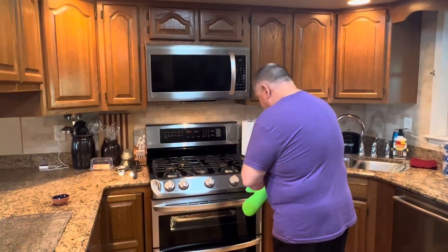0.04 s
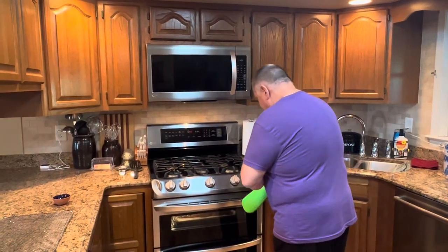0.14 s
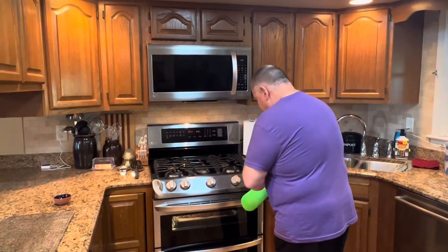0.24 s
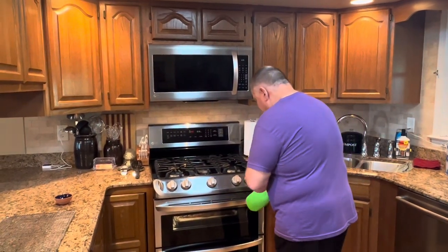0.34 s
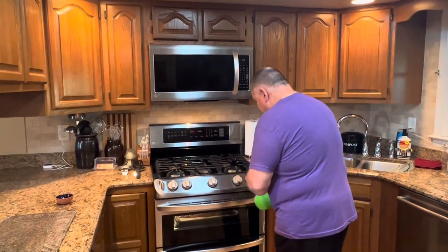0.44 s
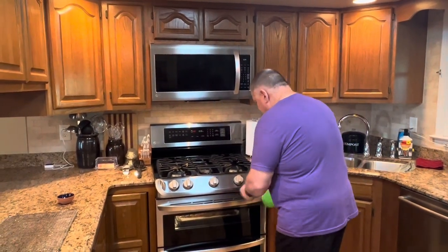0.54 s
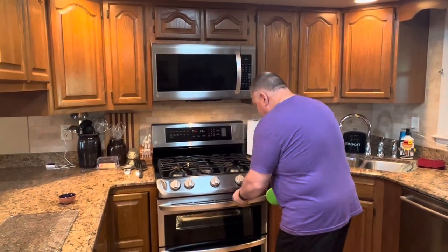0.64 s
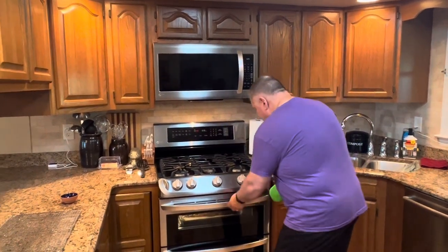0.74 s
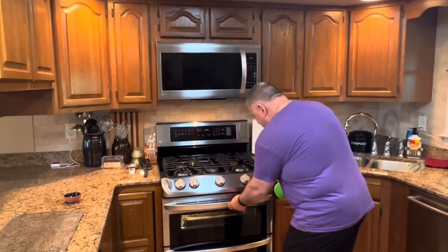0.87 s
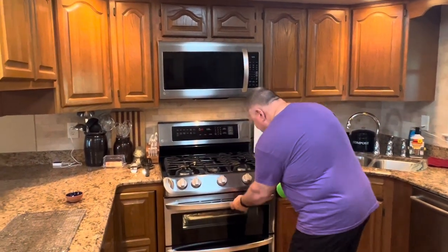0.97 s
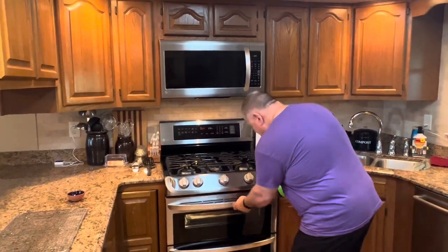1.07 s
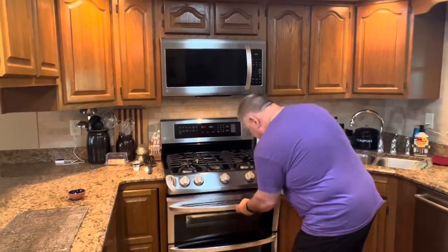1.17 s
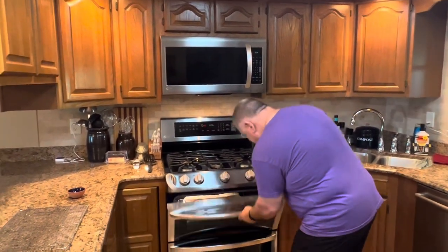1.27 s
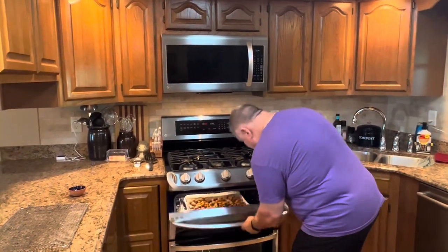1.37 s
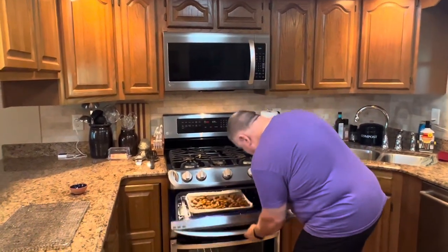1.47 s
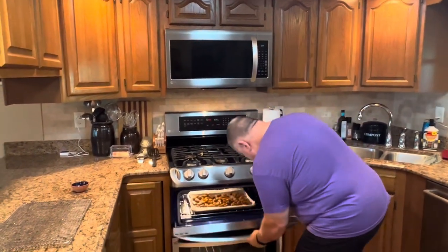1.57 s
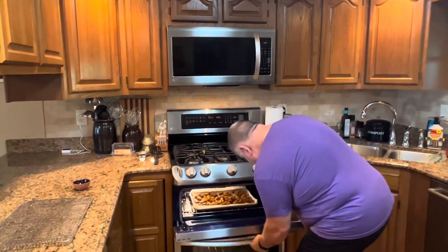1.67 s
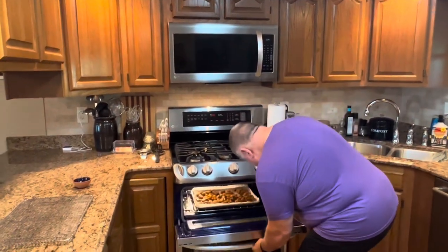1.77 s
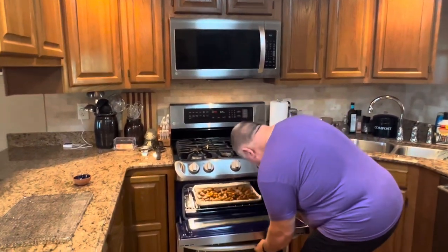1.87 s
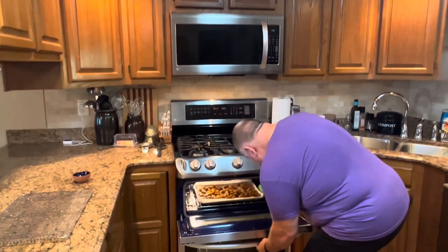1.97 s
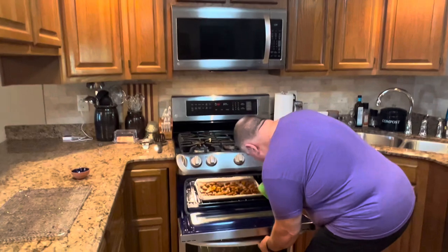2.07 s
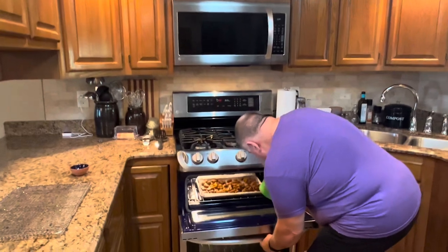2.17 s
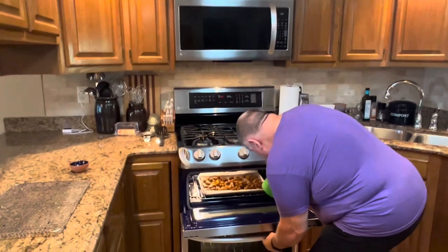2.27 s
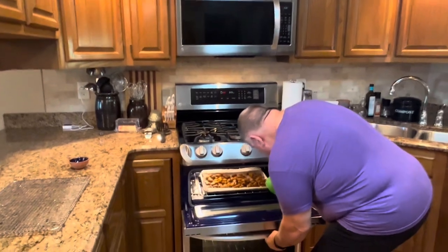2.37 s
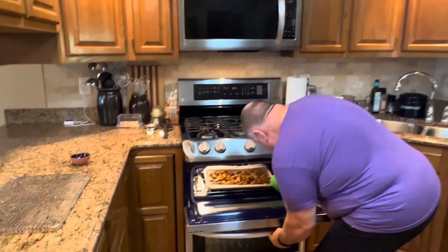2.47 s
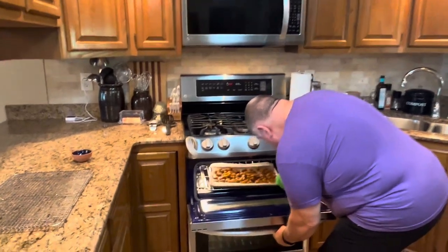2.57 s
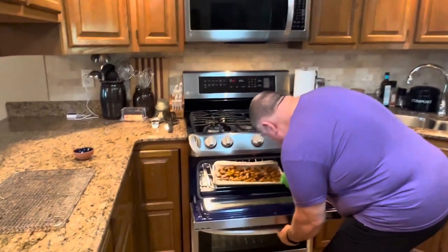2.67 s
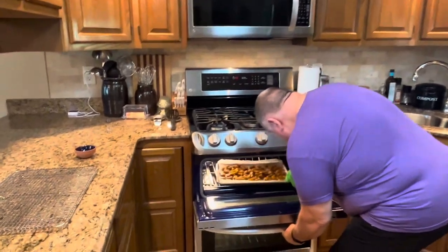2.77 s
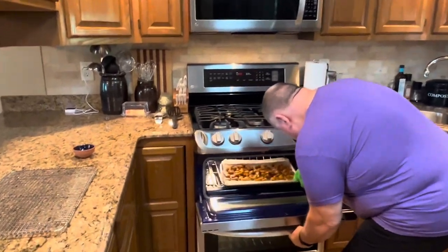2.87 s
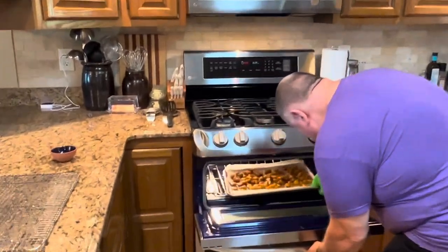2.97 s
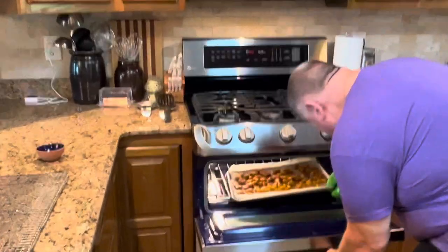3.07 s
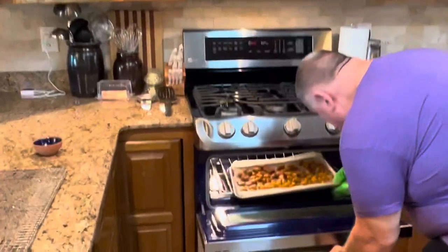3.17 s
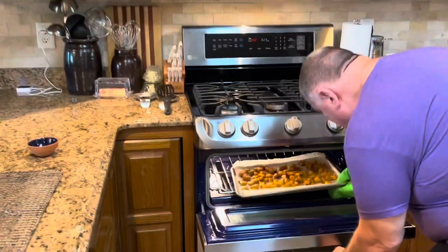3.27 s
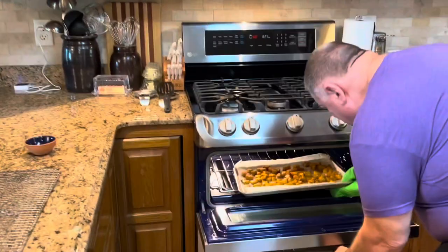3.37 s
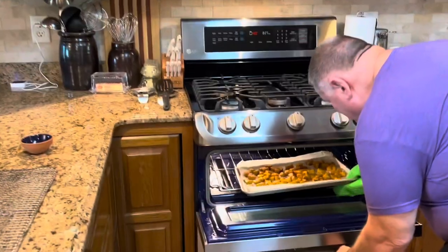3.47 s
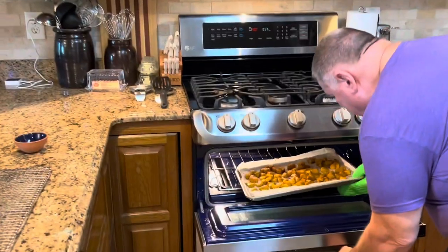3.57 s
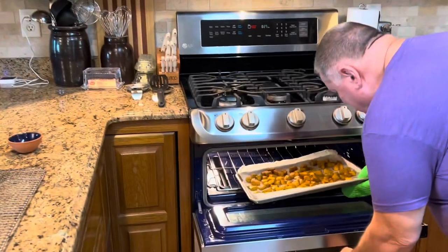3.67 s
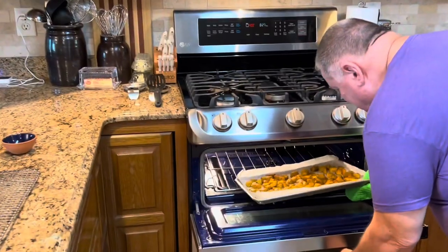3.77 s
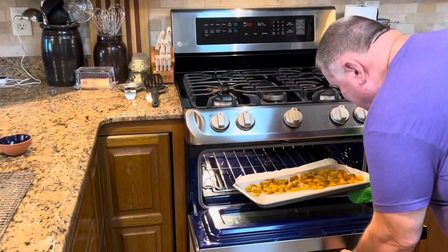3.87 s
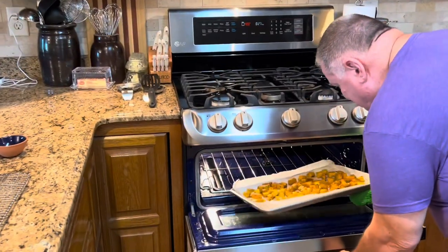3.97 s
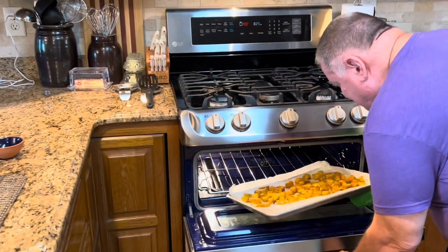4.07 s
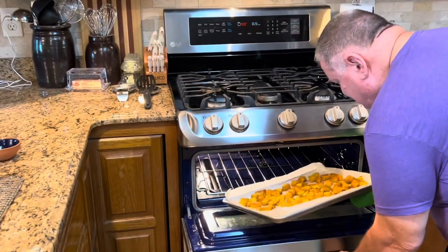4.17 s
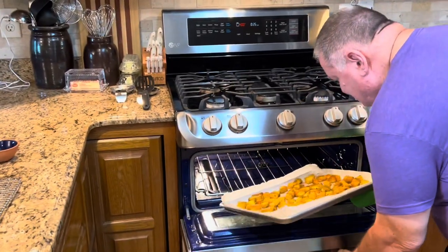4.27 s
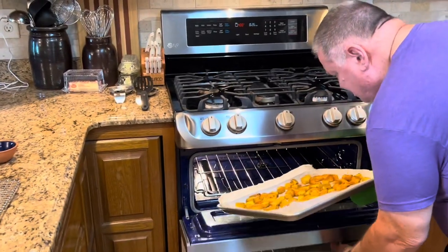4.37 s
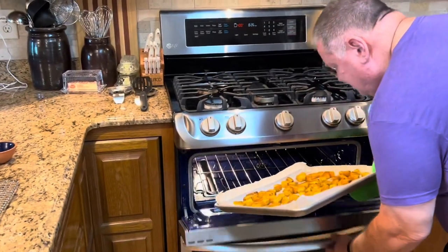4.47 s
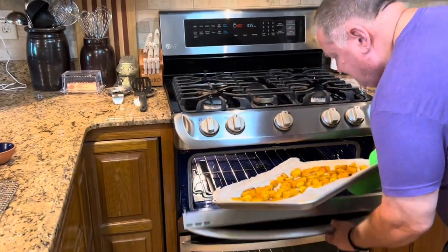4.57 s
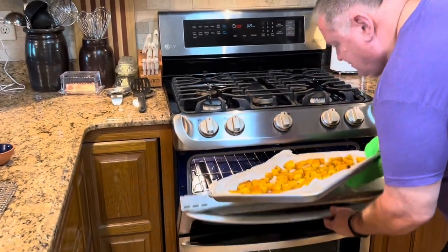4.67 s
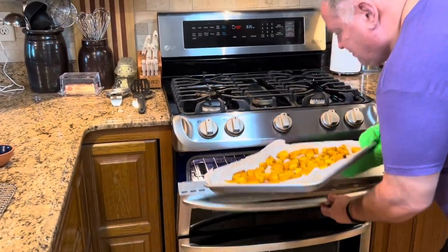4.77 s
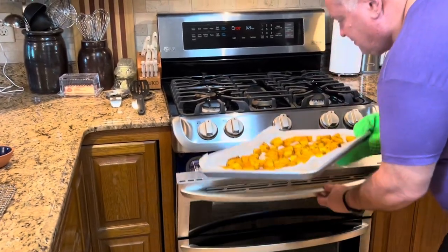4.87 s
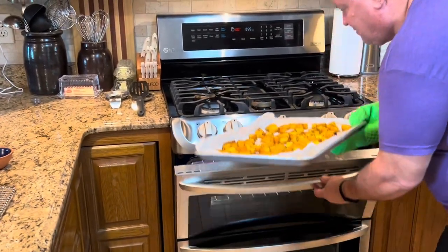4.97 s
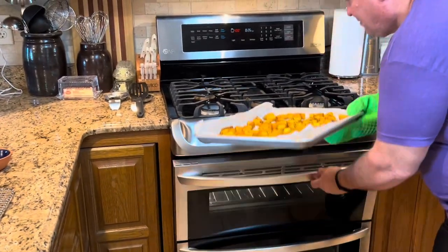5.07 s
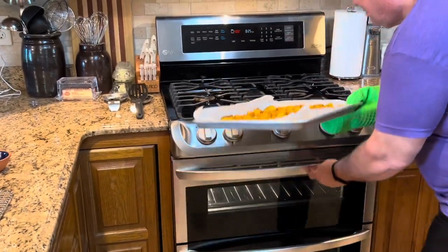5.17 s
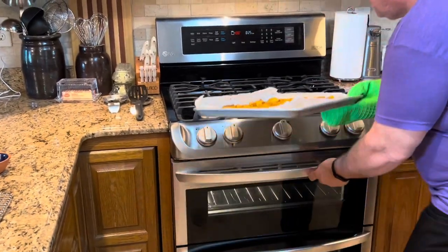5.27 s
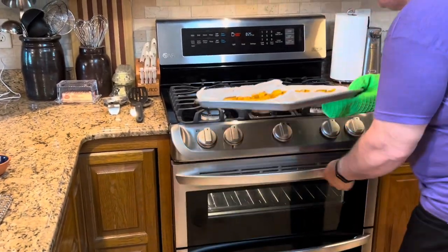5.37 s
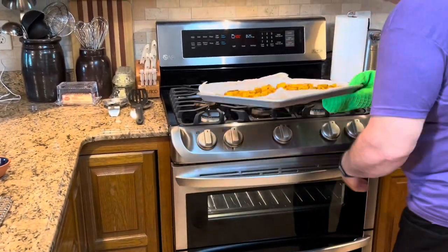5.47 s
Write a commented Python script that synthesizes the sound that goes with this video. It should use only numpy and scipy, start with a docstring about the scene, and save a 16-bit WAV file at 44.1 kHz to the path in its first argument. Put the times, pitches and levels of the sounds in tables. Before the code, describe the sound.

In a home kitchen with a faint low hum, an oven door is pulled open with rubbing hinges, dull rumble and scattered knocks. A baking sheet is dragged over the wire rack, grating and clinking while parchment rustles and snaps. After a quiet gap the door is lifted and slams loudly, with a short echo. Stereo microphone a few steps away.

```python
"""A low room hum and rubbing hinges come first, with knocks, as an oven door is pulled open in a kitchen.
Then a baking sheet lined with parchment is dragged out over the rack: wires grate and drone, paper rustles
and snaps, the sheet clinks and rings faintly. Last, the door is lifted and slammed. Shaped noise makes the
rubbing and the hum, bursts of tiny impacts the contacts, decaying sines the ringing metal.
Two microphone ports, close together, hear it from a few steps away, with the echoes of the kitchen."""
import sys
import numpy as np
from scipy import signal
from scipy.fft import rfft, irfft, next_fast_len
from scipy.io import wavfile
from scipy.ndimage import uniform_filter1d

SR = 44100
rng = np.random.default_rng(int(sys.argv[2]) if len(sys.argv) > 2 else 0)


def output_pcm(signal):
    """Save a mono or channel-first signal as 16-bit PCM at the path in sys.argv[1].

    Samples are clipped to [-1, 1] before scaling.
    """
    pcm = np.clip(np.atleast_2d(signal).T, -1, 1) * 32767
    wavfile.write(sys.argv[1], SR, np.round(pcm).astype(np.int16))


N = 243917  # length in samples

# Room hum. Each row: frequency in Hz, relative density in dB per Hz.
HUM_SPECTRUM = [(20, -44), (45, -42), (62, 12), (80, 4), (110, -10.5), (300, -3.5), (420, -13), (1000, -22),
                (1800, -65), (3000, -104.5), (7000, -30), (10000, -19.5), (11600, -75), (16000, -64)]
HUM_DB = -58.5  # rms

# Door swinging on its hinges, one table a swing.
# Each row: time in seconds, rubbing level in dB, rumble level in dB.
DOOR_SWINGS = [
    [(0, -56, -60), (.15, -66, -57), (.36, -69, -64), (.6, -59, -55.5), (.94, -64, -54), (1.06, -50, -53),
     (1.17, -63, -62), (1.23, -52, -45.5), (1.46, -56.5, -51), (1.66, -61, -54), (1.9, -61, -54),
     (2.15, -60.5, -63.5)],
    [(4.3, -70.5, -61.5), (4.6, -67, -57.5), (4.69, -58, -55), (4.82, -68, -61), (4.96, -56.5, -61),
     (5.03, -44, -59), (5.13, -64, -60)],
]
# Rubbing and scraping surfaces. Each row: frequency in Hz, relative density in dB per Hz.
RUB_SPECTRUM = [(200, -18), (600, -3), (1300, 2), (2500, 2), (3300, -5.5), (6000, 0), (10300, -8.5),
                (11800, -36), (16000, -31)]
# Low shaking of the stove and rack. Each row: frequency in Hz, relative density in dB per Hz.
RUMBLE_SPECTRUM = [(25, -48), (50, 1), (80, -4), (140, -9), (300, -22), (450, -29), (900, -56.5)]
# Harder rubbing is duller: dB per octave at the soft level, then dB per octave lost for each dB above it
RUB_SOFT_DB, RUB_SOFT_TILT_DB, DULLING = -67.5, -2, 0.22
# The door drifts from the left to the middle as the microphone turns to it: left minus right in dB
LEFT_AT_START_DB, LEFT_AT_END_DB = 8.5, 1.5
RUB_PAN_SHARE = 0.6  # part of that difference heard in the rubbing

# Door knocks. Each row: start in seconds, peak rattle level in dB, strongest ring in Hz,
# tilt in dB per octave, rattle decay in seconds (limited to 0.08), weight in dB:
# drive of the stove's thump against the rattle.
DOOR_KNOCKS = [(0.269, -63.5, 405, 2, 0.049, -22), (0.309, -59, 519, -2.5, 0.031, -4),
               (0.451, -38.5, 1050, -4.5, 0.025, -39), (0.731, -58.5, 1630, 0, 0.023, -25),
               (0.838, -56.5, 1150, 0.5, 0.048, 4), (0.969, -51, 2440, -4, 0.094, -18),
               (1.029, -42.5, 665, -3.5, 0.014, -12), (1.075, -55, 1140, -4, 0.01, 9.5),
               (1.208, -40, 740, -4.5, 0.008, -2.5), (1.215, -36.5, 378, -3.5, 0.021, -1),
               (1.259, -47, 514, -5.5, 0.034, -24), (1.431, -47, 590, -4.5, 0.0083, 2.5),
               (1.803, -47, 2300, 0, 0.023, -18), (2.031, -55.5, 2300, 0.5, 0.042, -21),
               (4.553, -57.5, 620, -0.5, 0.016, 9), (4.67, -44.5, 1490, -9, 0.028, -6.5),
               (4.918, -64, 398, -1, 0.028, 15.5), (4.991, -37.5, 785, -3, 0.088, -0.5),
               (5.023, -54, 634, 23, 0.009, 18.5), (5.083, -36, 443, -1.5, 0.03, 1),
               (5.116, -51, 466, -8, 0.016, -8), (5.156, -21.5, 5100, 9.5, 0.015, -6),
               (5.169, -22.5, 420, -0.5, 0.025, -0.5), (5.186, -10.5, 1780, 2, 0.014, -18.5),
               (5.2, -16.5, 373, -1, 0.02, -16), (5.219, -25.5, 1920, -2.5, 0.053, -4.5),
               (5.304, -38.5, 1870, 1.5, 0.071, -3), (5.477, -41.5, 1184, 3, 0.016, 0)]
# Rattle of hard contacts. Each row: frequency in Hz, relative density in dB per Hz.
KNOCK_SPECTRUM = [(150, -9), (400, 3.5), (1000, 4), (1900, 2.5), (2600, 2), (3200, -4), (5000, -5.5),
                  (8000, -4), (10600, -7.5), (11500, -19), (16000, -25)]
# Door panel modes. Each row: frequency in Hz, relative level in dB, undamped t60 in seconds.
DOOR_MODES = [(1070, -24, .5), (1280, 4, 0.31), (1400, 9, 0.28), (1630, -21, 0.23), (1834, 5, 0.61),
              (1964, 18, 0.41), (2300, -14, 0.45), (2900, -12, .4), (3490, 23.5, 0.5)]
# Low modes of the stove body. Each row: frequency in Hz, level in dB, t60 in seconds.
STOVE_MODES = [(39.8, 3.5, 0.72), (59, -2, 0.7), (90.6, 7, 0.09), (130.3, 1.5, 0.19), (229.3, 5.5, 0.16),
               (301.4, 7.5, 0.13), (362, -21, 0.11)]
KNOCK_RISE_S, KNOCK_RING_DB = 0.0027, 6.5
RISE_DOUBLES_DB = 15  # a heavier knock lands more softly: its rise doubles with this much more weight
BODY_DB, BODY_PER_WEIGHT = 5, 0.66  # a heavier knock has more body under 700 Hz: dB, dB per dB of weight
# Harder knocks reach the deeper modes: thump centre of a -38 dB knock, octaves down per dB above that
THUMP_HZ, THUMP_DROP_PER_DB = 126.7, 0.03

# Sheet dragged over the rack. Each row: time in seconds, scraping level in dB, rumble level in dB.
SHEET_DRAG = [(2.1, -69.5, -66), (2.3, -58, -64.5), (2.5, -53, -59.5), (2.69, -57.5, -61.5),
              (2.83, -52, -51), (2.98, -52, -61), (3.08, -58, -53.5), (3.45, -54.5, -50), (3.6, -55, -56.5),
              (3.78, -51.5, -60), (3.84, -60, -63), (3.97, -72.5, -64), (4.3, -68.5, -64.5)]
# Paper shifting on the sheet. Each row: time of full level in seconds, rustle level in dB, hold in seconds.
PAPER_RUSTLES = [(2.30, -50, 0.0077), (2.49, -49, 0.035), (2.73, -59, 0.03), (2.95, -59.5, .18),
                 (3.56, -50.5, 0.2)]
RUSTLE_RISE_S, RUSTLE_FADE_DB_PER_S = 0.017, 210
# Rack wires shuddering under the weight.
# Each row: time of full level in seconds, drone level in dB, hold in seconds.
RACK_DRONES = [(2.85, -60, 0.34), (3.56, -74, .05), (3.83, -73, 0.027)]
# Drone of the rack wires. Each row: frequency in Hz, relative density in dB per Hz.
RACK_SPECTRUM = [(200, -40), (280, -9), (310, 21), (340, 3.5), (480, -18), (700, -99)]
DRONE_RISE_S, DRONE_FADE_DB_PER_S, DRONE_UNDER_SCRAPE_DB = 0.059, 54, -13

# Parchment snaps. Each row: start in seconds, peak level in dB, strongest ring in Hz,
# tilt in dB per octave, crackle decay in seconds.
PARCHMENT_SNAPS = [(2.1797, -49.5, 7100, -2, 0.023), (2.263, -45.5, 2140, -3, 0.0053),
                   (2.3048, -51.5, 5900, 5, 0.019), (2.4292, -48, 7960, 0.5, 0.015),
                   (2.501, -48.5, 8500, -4.5, 0.064), (2.5411, -35.5, 5800, 1, 0.018),
                   (2.731, -50.5, 6600, 7, 0.02), (2.7546, -47.5, 6540, -5, 0.03),
                   (2.8977, -48, 2380, -3.5, 0.042), (2.9498, -43, 2780, 9, 0.013),
                   (2.9604, -38.5, 7960, 0.5, 0.0073), (3.1227, -40.5, 4630, 3, 0.012),
                   (3.198, -27.5, 8950, 0, 0.0074), (3.2426, -36, 7300, 1, 0.039),
                   (3.2932, -32.5, 10200, 1, 0.0093), (3.3458, -36, 9700, 9, 0.0079),
                   (3.431, -37, 5640, 3.5, 0.0086), (3.5504, -34, 6160, 4, 0.006),
                   (3.9172, -46, 6300, 3.5, 0.013)]
# Brightness of the paper. Each row: frequency in Hz, relative density in dB per Hz.
PAPER_SPECTRUM = [(500, -6.5), (1500, 6), (3000, 8), (5500, 6), (8500, 7), (10500, 12.5), (11800, -6),
                  (16000, -4.5)]

# Sheet clinking on the rack wires. Each row: start in seconds, peak level in dB,
# strongest ring of the contact in Hz, contact decay in seconds.
RACK_CLINKS = [(2.545, -51.5, 1620, 0.016), (2.894, -57, 2650, 0.017), (3.565, -54, 1300, 0.019),
               (3.661, -50.5, 2820, 0.039), (3.718, -46, 3220, 0.019), (3.734, -60, 1500, 0.025),
               (3.59, -64, 673, 0.05), (3.80, -62, 1730, 0.022), (3.915, -63, 3400, 0.016)]
# Baking sheet modes. Each row: frequency in Hz, relative level in dB, undamped t60 in seconds.
SHEET_MODES = [(700, -1, .2), (1147, -8, .25), (1300, 0, .12), (1465, -2, .2), (1600, -2, .08),
               (1715, -6, 1.1), (2770, 3, .06), (3075, 0, .08), (3280, 3, .06), (4300, 0, .15)]

# Echo tail of the kitchen. Each row: frequency in Hz, t60 in seconds.
KITCHEN_T60 = [(60, 0.19), (170, 1), (400, 1), (1000, 0.88), (4000, 0.83), (9000, 0.54), (14000, 0.18)]
# Diffuse sound at the two ports. Each row: frequency in Hz, likeness of the ports from 0 to 1.
PORT_LIKENESS = [(60, 0.96), (300, 0.85), (800, 0.35), (1500, 0.18), (3000, 0.36), (6000, 0.45), (9000, 1)]
# Phase between the ports. Each row: frequency in Hz, radians by which the left leads.
PORT_LEAD_PHASE = [(1500, 0), (5000, .35), (8500, .1), (9900, -3.0), (10500, -3.3), (11600, -6.2),
                   (12600, -6.4), (13400, -9.3), (14300, -9.6), (15200, -12.5)]
EDGE_HZ = 16100  # upper band limit


def gain_of(db):
    """Decibels to a factor."""
    return 10 ** (np.asarray(db) / 20)


def evened(x):
    """Scales to rms 1."""
    return x / np.sqrt(np.mean(x ** 2) + 1e-20)


def peak_evened(x):
    """Scales so that the loudest 200 samples have rms 1."""
    return x / np.sqrt(uniform_filter1d(x ** 2, size=200).max())


def smoothed(x, size, axis=-1):
    """Two running averages in a row."""
    once = uniform_filter1d(x, size=size, axis=axis)
    return uniform_filter1d(once, size=size, axis=axis)


def read(points, hz):
    """Value of a table at hz, straight on a log axis."""
    f, value = np.transpose(points)
    return np.interp(np.log(hz + 1), np.log(f + 1), value)


def add(mix, s, sound):
    """Lays a sound into the mix at s seconds."""
    part = mix[round(s * SR):][:len(sound)]
    part += sound[:len(part)]


def curves(rows):
    """A window that is 1 while a table runs, with soft edges, then its columns as curves over all samples."""
    s, *columns = np.transpose(rows)
    t = np.arange(N) / SR
    inside = ((t >= s[0]) & (t <= s[-1])) * 1.
    running = uniform_filter1d(inside, size=2000, mode="nearest")
    return running, *(np.interp(t, s, c) for c in columns)


def noise(spectrum, tilt_db=0., patchy_db=2., size=1024):
    """Random short-time spectra, partly alike at both ports, with drifting patches and a tilt that may move."""
    hop = size // 4
    frames, hz = N // hop + 5, np.fft.rfftfreq(size, 1 / SR)
    a, b, c, d, patches = rng.standard_normal((frames, len(hz), 5)).T
    patches = evened(smoothed(smoothed(patches, 8, axis=0), 8, axis=1))
    tilt_db = np.interp(np.arange(frames) * hop, np.arange(N), tilt_db * np.ones(N))
    octaves = np.log2((hz[:, None] + 50) / 1500)
    shape = gain_of(read(spectrum, hz)[:, None] + octaves * tilt_db)
    shape /= np.sqrt((shape ** 2).mean(axis=0))
    same = np.clip(read(PORT_LIKENESS, hz), 0, 1)[:, None]
    left = a + 1j * b
    right = same * left + np.sqrt(1 - same ** 2) * (c + 1j * d)
    z = np.array([left, right]) * shape * gain_of(patchy_db * patches)
    return evened(signal.istft(z, nperseg=size, noverlap=size - hop)[1][:, :N])


def room_hum():
    """The room hums low: steady noise weighted to the bass."""
    return gain_of(HUM_DB) * noise(HUM_SPECTRUM, patchy_db=3.0, size=2048)


def door_pan_db(s):
    """Left minus right level of the door at time s."""
    return LEFT_AT_START_DB + (LEFT_AT_END_DB - LEFT_AT_START_DB) * s * SR / N


def panned(x, pan_db):
    """Shares a level difference between the ports."""
    return x * gain_of(np.multiply.outer([.5, -.5], pan_db * np.ones(N)))


def door_swings():
    """Hinges and gasket rub while the heavy door shakes the stove."""
    out = np.zeros((2, N))
    pan_db = RUB_PAN_SHARE * door_pan_db(np.arange(N) / SR)
    for rows in DOOR_SWINGS:
        running, rub_db, rumble_db = curves(rows)
        tilt_db = RUB_SOFT_TILT_DB - DULLING * (rub_db - RUB_SOFT_DB)
        rub = gain_of(rub_db) * noise(RUB_SPECTRUM, tilt_db, patchy_db=-2.0, size=512)
        rumble = gain_of(rumble_db) * noise(RUMBLE_SPECTRUM, patchy_db=2., size=2048)
        out += running * (panned(rub, pan_db) + rumble)
    return out


def causal(db):
    """Impulse response with this spectrum that starts at once (minimum phase)."""
    cepstrum = irfft(np.log(gain_of(db)))
    half = len(cepstrum) // 2
    cepstrum[1:half] *= 2
    cepstrum[half + 1:] = 0
    return irfft(np.exp(rfft(cepstrum)))[:half]


def uneven(spread_db, count):
    """Sizes of tiny impacts: mostly alike, a few larger."""
    return gain_of(spread_db * np.minimum(rng.exponential(1, count), 4))


def contact(spectrum, ring_hz, tilt_db, rise, length, bump_db, spread_db, body_db=0.):
    """Tiny uneven impacts that swell and die away, coloured by the object; loudest stretch at rms 1."""
    t, hz = np.arange(8192) / SR, np.fft.rfftfreq(4096, 1 / SR)
    impacts = rng.standard_normal(8192) * uneven(spread_db, count=8192)
    impacts *= np.exp(-t / np.clip(length, .002, .08))
    impacts *= 1 - np.exp(-t / np.clip(rise, .0002, .03))
    tilt = tilt_db * np.log2((hz + 50) / 2000)
    bump = bump_db * np.exp(-(np.log2((hz + 50) / ring_hz) / .3) ** 2)
    body = body_db / (1 + (hz / 700) ** 4)
    # each contact favours other bands
    ripple = 1.6 * evened(smoothed(rng.standard_normal(len(hz)), 30))
    colour = causal(read(spectrum, hz) + tilt + bump + body + ripple)
    return peak_evened(signal.oaconvolve(impacts, colour))


def ringing(modes, damping, spread):
    """Impulse response of a metal part, energy 1: each mode is a tight beating cluster, a touch damps it."""
    t = np.arange(SR)[:, None] / SR
    hz, db, t60 = np.transpose(modes)
    beats = 0
    for _ in range(4):
        detuned_hz = hz * (1 + spread * rng.standard_normal(len(hz)))
        beats = beats + np.sin(2 * np.pi * detuned_hz * t)
    ring = (gain_of(db - 60 * t / (t60 * damping)) * beats).sum(axis=1)
    return ring / np.linalg.norm(ring)


def thump(hz, rise):
    """The heavy stove body answers a push with its low modes, most with those near hz."""
    t = np.arange(SR // 2)[:, None] / SR
    mode_hz, db, t60 = np.transpose(STOVE_MODES)
    near_db = -9. * abs(np.log2(mode_hz / hz))
    decay = gain_of(db + near_db - 60 * t / t60)
    modes = decay * np.sin(2 * np.pi * mode_hz * t) * rng.choice([-1, 1], len(db))
    return modes.sum(axis=1) * (1 - np.exp(-t[:, 0] / (rise + 0.00043)))


def door_knocks():
    """Each knock rattles, rings the door panel and pushes a low thump through the stove."""
    rattle, thumps = np.zeros((2, N)), np.zeros(N)
    for s, db, hz, tilt_db, length, weight_db in DOOR_KNOCKS:
        rise = KNOCK_RISE_S * 2 ** (weight_db / RISE_DOUBLES_DB)
        body_db = BODY_DB + BODY_PER_WEIGHT * weight_db
        sound = contact(KNOCK_SPECTRUM, hz, tilt_db, rise, length, KNOCK_RING_DB, 2., body_db)
        add(rattle[0], s, gain_of(db + door_pan_db(s) / 2) * sound)
        add(rattle[1], s, gain_of(db - door_pan_db(s) / 2) * sound)
        thump_hz = THUMP_HZ / 2 ** (THUMP_DROP_PER_DB * (db + 38))
        add(thumps, s, gain_of(db + weight_db) * thump(thump_hz, rise))
    door = ringing(DOOR_MODES, 0.14, spread=0.009)
    panel = signal.fftconvolve(rattle.mean(axis=0), door)[:N]
    return rattle + thumps + gain_of(-18.5) * panel


def swells(rows, rise, fade_db_per_s):
    """Each row rises to its time, holds and fades by one rule."""
    t, out = np.arange(N) / SR, np.zeros(N)
    for s, db, hold in rows:
        fade_db = fade_db_per_s * np.maximum(t - s - hold, 0)
        out += np.clip((t - s) / rise + 1, 0, 1) ** 2 * gain_of(db - fade_db)
    return out


def sheet_drag():
    """The sheet grates over the wires in uneven slips, the rack drones and the paper rustles."""
    running, scrape_db, rumble_db = curves(SHEET_DRAG)
    slips, creases = (evened(uniform_filter1d(uneven(7., count=N), size=40)) for _ in range(2))
    scrape = gain_of(scrape_db) * slips * noise(RUB_SPECTRUM, -2.15, patchy_db=0.0, size=512)
    shifting = swells(PAPER_RUSTLES, RUSTLE_RISE_S, RUSTLE_FADE_DB_PER_S)
    rustle = shifting * creases * noise(PAPER_SPECTRUM, patchy_db=3., size=256)
    shudder = swells(RACK_DRONES, DRONE_RISE_S, DRONE_FADE_DB_PER_S)
    shudder += gain_of(scrape_db + DRONE_UNDER_SCRAPE_DB)
    drone = shudder * noise(RACK_SPECTRUM, patchy_db=1., size=2048)
    rumble = gain_of(rumble_db) * noise(RUMBLE_SPECTRUM, 2.5, patchy_db=2., size=2048)
    return running * (scrape + rustle + drone + rumble)


def paper_snaps():
    """Creases in the parchment let go in short bright clusters."""
    out = np.zeros(N)
    for s, db, hz, tilt_db, length in PARCHMENT_SNAPS:
        snap = contact(PAPER_SPECTRUM, hz, tilt_db, .0006, length, bump_db=8., spread_db=2.5)
        add(out, s, gain_of(db) * snap)
    return out


def sheet_clinks():
    """Short rattling contacts with the rack, which also set the modes of the sheet ringing."""
    out, sheet = np.zeros(N), ringing(SHEET_MODES, .9, spread=.0015)
    for s, db, hz, length in RACK_CLINKS:
        rattle = contact(KNOCK_SPECTRUM, hz, 0, 0.00063, length, bump_db=14.0, spread_db=3.5)
        clink = signal.fftconvolve(rattle, sheet)
        add(clink, 0, 0.56 * rattle)
        add(out, s, gain_of(db) * peak_evened(clink))
    return out


def echoes():
    """Sparse echoes of random sign: strong early ones off the cabinets, then a tail dying band by band."""
    taps = np.zeros((2, SR))
    at = np.arange(60, SR - 20, 20) + rng.integers(0, 20, (2, (SR - 61) // 20))
    np.put_along_axis(taps, at, rng.choice([-1., 1.], at.shape), 1)
    hz, t, z = signal.stft(taps, SR, nperseg=256)
    same = np.clip(read(PORT_LIKENESS, hz) - .02, 0, 1)[:, None]
    z[1] = same * z[0] + np.sqrt(1 - same ** 2) * z[1]
    late = gain_of(-60 * t / read(KITCHEN_T60, hz)[:, None])
    early = gain_of(8.0 - 60 * t / 0.17)
    tail = signal.istft(z * (late + early), SR, nperseg=256)[1]
    return tail / np.linalg.norm(tail[0])


def kitchen(x):
    """Sounds start at ever different spots, so three sets of echoes take turns."""
    turn = 2 * np.pi * 12 * np.arange(N) / SR  # 12 turns a second
    out = np.zeros((2, N))
    for k in range(3):
        share = np.sqrt(2 / 3) * np.cos(turn + 2 * np.pi * k / 3)
        out += signal.fftconvolve((share * x)[None], echoes(), axes=1)[:, :N]
    return out


def scene():
    """Everything at the oven with its echoes, over the hum of the room."""
    hits = door_knocks() + paper_snaps() + sheet_clinks()
    rubs = door_swings() + sheet_drag()
    reflected = kitchen((hits + 0.36 * rubs).mean(axis=0))
    return hits + rubs + gain_of(-1.5) * reflected + room_hum()


def record(dry):
    """Deepest bass is cut, treble slips out of step between the ports, peaks round off; then the band limit."""
    size = next_fast_len(N + 4096)
    lead = read(PORT_LEAD_PHASE, np.fft.rfftfreq(size, 1 / SR))
    lean = signal.sosfilt(signal.butter(3, 38., "high", fs=SR, output="sos"), dry)
    turned = rfft(lean, size) * np.exp(1j * np.array([lead, -lead]) / 2)
    ports = irfft(turned, size)[:, :N]
    soft = .95 * np.tanh(ports / .95)
    band_limit = signal.firwin(511, EDGE_HZ, window=("kaiser", 9), fs=SR)
    return signal.oaconvolve(soft, band_limit[None], "same")


dry = scene()
out = record(dry)
output_pcm(out)
```